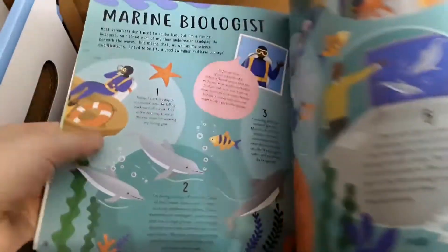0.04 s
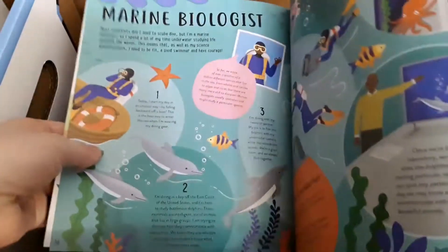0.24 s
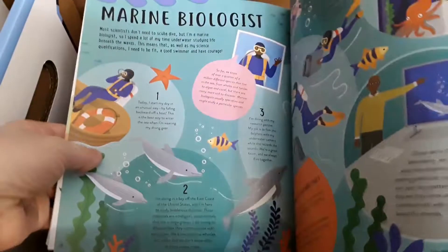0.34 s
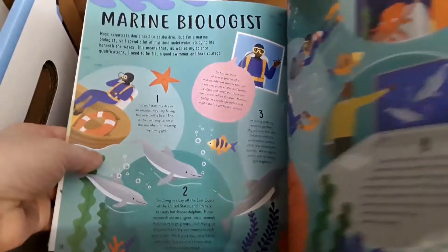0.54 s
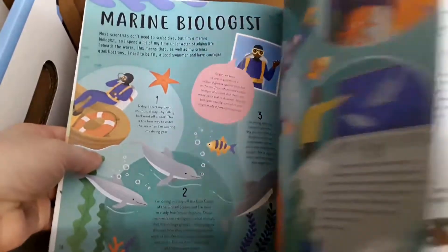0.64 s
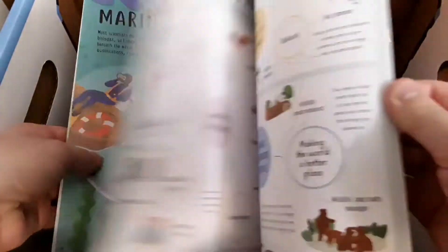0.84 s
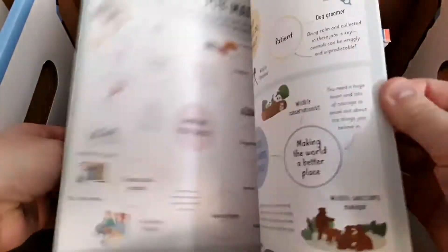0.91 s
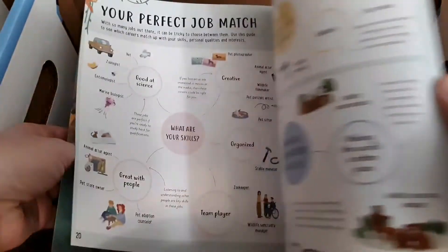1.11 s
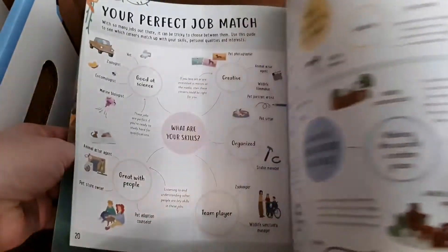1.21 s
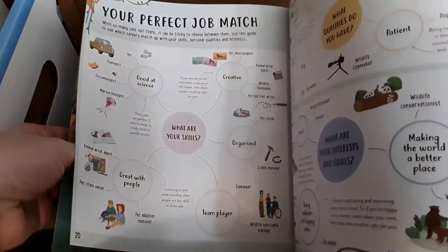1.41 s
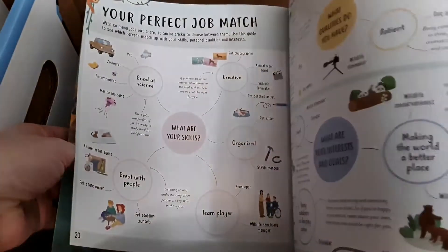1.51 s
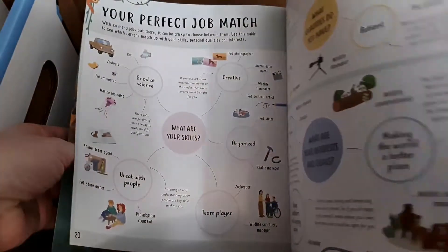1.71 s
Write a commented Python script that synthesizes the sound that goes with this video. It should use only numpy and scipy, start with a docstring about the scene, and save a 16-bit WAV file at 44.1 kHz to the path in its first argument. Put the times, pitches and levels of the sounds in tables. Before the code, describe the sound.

Pages of a book turn close to the microphone in a quiet little room. One sheet rustles, snaps free and lands with a flap; another slides and pops more softly, before a few light fingertip taps.

```python
"""Paper slides and crackles as a picture book's page is turned by hand, close up in a small quiet room. The
sheet snaps free and flaps down, and the book shudders while the page slides over it; a second page buckles with
hollow pops, and fingers tap the book lightly at the end. Friction makes the hiss and ticks of the paper; pops,
slap, shudders and taps are damped modes. The microphone's resonance lifts the high treble."""
import sys
import numpy as np
from scipy import signal
from scipy.fft import rfft, irfft
from scipy.io import wavfile
from scipy.ndimage import uniform_filter1d

SR = 44100
rng = np.random.default_rng(int(sys.argv[2]) if len(sys.argv) > 2 else 0)


def log_audio(samples):
    """Write samples as a 16-bit WAV file to the path given in sys.argv[1]."""
    # one column per channel
    frames = np.atleast_2d(samples).T
    # limit to full scale, then quantise
    limited = np.clip(frames, -1, 1)
    pcm = np.round(limited * 32767).astype(np.int16)
    wavfile.write(sys.argv[1], SR, pcm)


N = 77175
T = np.arange(N) / SR
BIN_HZ = abs(np.fft.fftfreq(2048, 1 / SR))
LANDING_S, SHEET_RISE_S = 0.2103, 0.00081
RUB_RISE_S, RUB_FALL_S = 0.0017, 0.008


def amp(db):
    return 10 ** (np.asarray(db) / 20)


def unit(x):
    return x / np.sqrt(np.mean(x ** 2) + 1e-20)


def curve_at(points, hz):
    """Interpolation on a logarithmic frequency axis."""
    f, value = np.transpose(points)
    return np.interp(np.log(hz + 1), np.log(f + 1), value)


def colour(x, spectrum, tilt_db=0):
    """Spectral shaping, with a tilt per octave above 400 Hz, at rms 1."""
    hz = np.fft.rfftfreq(N, 1 / SR)
    gain_db = curve_at(spectrum, hz) + tilt_db * np.log2(np.maximum(hz, 400))
    return unit(irfft(rfft(x) * amp(gain_db), N))


def minimum_phase(db):
    """The most compact causal impulse response with these gains at BIN_HZ."""
    response = np.fft.ifft(np.exp(np.conj(signal.hilbert(np.log(amp(db)))))).real
    return response[:len(response) // 2]


def gate(start, length, rise, fall):
    """Linear attack, hold, exponential release."""
    t = T - start
    return np.clip(t / rise, 0, 1) * np.exp(-np.maximum(t - length, 0) / fall)


def swells(rows):
    """Gaussian humps of amplitude."""
    return sum(amp(db) * np.exp(-((T - s) / width) ** 2) for s, width, db in rows)


def ring(modes, start, hold, rise, pitch=1, waver=0):
    """Damped modes decay exponentially once the drive ends; waver is the relative rms pitch jitter."""
    out = np.zeros(N)
    for hz, db, t60 in modes:
        speed = 1 + waver * unit(uniform_filter1d(rng.standard_normal(N), size=500)) if waver else 1
        cycles = np.cumsum((T >= start) * speed) * hz * pitch / SR
        out += amp(db) * gate(start, hold, rise, t60 / np.log(1000)) * np.sin(2 * np.pi * cycles)
    return out


def friction(catches_per_s=3000, spread_db=3.5, hiss_share=0.48):
    """Stick-slip friction: paper fibres catch at random over a smooth hiss."""
    catches = (rng.random(N) < catches_per_s / SR) * rng.choice([-1, 1], N)
    strength = amp(spread_db * np.minimum(rng.exponential(1, N), 4))
    hiss = rng.standard_normal(N)
    return np.sqrt(1 - hiss_share) * unit(catches * strength) + np.sqrt(hiss_share) * hiss


def flap():
    """Damped oscillation: the landing sheet swings a few times in one low mode."""
    hz, db, t60 = 274.7, -19.5, 0.022
    return ring([(hz, db, t60)], LANDING_S, hold=0.015, rise=0.0014)


def slap():
    """Impact excitation: the landing sets many modes of the sheet ringing at once."""
    # Each row: frequency in Hz, relative level in dB, T60 in seconds.
    modes = [(325.7, 2.5, 0.12), (424, -12.5, 0.056), (479, -9, .09), (543.7, -4, 0.075), (867, -4, 0.0514),
             (1200, -7, 0.086), (1626, -8.5, .08), (1747, -3.5, 0.022)]
    return amp(-28) * ring(modes, LANDING_S, 0, SHEET_RISE_S)


def pops():
    """Snap-through buckling: the bent sheet jumps to a new shape and rings hollowly."""
    # Each row: start in seconds, level in dB, pitch in Hz.
    buckles = [(.0304, -36, 825), (1.0313, -39, 1010), (1.0357, -27.5, 911), (1.0375, -27, 1074),
               (1.046, -34, 1017), (1.0528, -27.5, 1085), (1.0575, -34.5, 1443), (1.0604, -29, 946),
               (1.065, -38, 1204), (1.071, -34.5, 1055)]
    # Each row: ratio to the pitch, relative level in dB, T60 in seconds.
    modes = [(.38, -5.5, 0.032), (.75, -2, 0.011), (1, 3.5, 0.016), (1.5, -10.5, 0.025)]
    return sum(amp(db) * ring(modes, s, 0, SHEET_RISE_S, hz) for s, db, hz in buckles)


def shudders(book_hz=128.1, book_t60=0.18, flutter_t60=0.13):
    """Driven vibration: the book booms, and the loose sheet flutters at a pitch set by its bend."""
    # Each row: start and length in seconds, boom level in dB, flutter pitch in Hz, flutter level in dB.
    shakes = [(0.04, 0.015, -54.5, 271, -63), (0.148, 0.03, -61, 276, -53.5),
              (.184, 0.016, -50, 285, -41.5), (0.216, 0.046, -31.5, 273, -37),
              (0.273, 0.051, -41.5, 280.3, -42), (.415, 0.016, -55, 330, -81),
              (0.513, 0.034, -44.5, 302, -49), (1.095, 0.016, -53.5, 320, -76)]
    out = np.zeros(N)
    for s, length, boom_db, flutter_hz, flutter_db in shakes:
        modes = [(book_hz, boom_db, book_t60), (flutter_hz, flutter_db, flutter_t60)]
        out += ring(modes, s, length, rise=0.013, waver=0.075)
    return out


def ticks(peak_db=7.5, width_hz=600):
    """Impulse response: a sharp slip of the paper's edge and a scatter of smaller ones ring briefly."""
    # Each row: start in seconds, level in dB, tilt above 4 kHz in dB per octave, resonance in Hz.
    edge_ticks = [(0.1596, -38, -14, 8400), (.2060, -16.5, 1.5, 9430), (0.207, -33, 3, 1800),
                  (0.2111, -26, 10, 8200), (0.217, -26, 7, 8500), (0.2384, -28, -1, 9100),
                  (0.507, -40, -7, 8300), (0.5257, -30, -6, 9600), (0.5454, -25, -6.5, 8920),
                  (0.632, -54.5, -19, 7400), (0.774, -49, -8, 8520), (0.7983, -43.5, -11, 8600),
                  (0.8511, -48, -9, 8500), (1.0241, -34, -3, 3040), (1.69, -49, -13.5, 3110),
                  (1.742, -55, -2, 8900)]
    # Each row: frequency in Hz, gain in dB.
    spectrum = [(200, -6.5), (1500, -11), (4000, -12), (6500, -8.5), (8400, -2), (9800, -1), (12300, -4.5),
                (13500, -13), (16000, -24.5)]
    octaves = np.log2(np.maximum(BIN_HZ, 4000) / 8000)
    out = np.zeros(N)
    for s, db, tilt_db, hz in edge_ticks:
        slips = rng.standard_normal(N) * gate(s, 0, rise=0.00099, fall=0.002)
        slips *= amp(-3) / np.linalg.norm(slips)
        slips[round(s * SR)] += 1  # the main slip, 3 dB above the scatter in energy
        resonance_db = peak_db / (1 + (2 * (BIN_HZ - hz) / width_hz) ** 2)
        response = minimum_phase(curve_at(spectrum, BIN_HZ) + resonance_db + tilt_db * octaves)
        out += amp(db) * signal.oaconvolve(slips, response)[:N]
    return out


def crumples():
    """Stick-slip in the bending sheet gives dull bursts of tiny catches."""
    # Each row: centre and half width in seconds, level in dB.
    bursts = [(.032, 0.0011, -41), (.2098, 0.0023, -29), (.24, 0.0087, -34), (0.517, 0.0049, -57)]
    # Each row: frequency in Hz, relative spectral density in dB.
    spectrum = [(100, -12.5), (400, 10.5), (900, 5.5), (1700, -3.5), (3000, -8.5), (5000, -11.5),
                (9000, -27), (16000, -50)]
    return swells(bursts) * colour(friction(), spectrum)


def slides():
    """Sliding friction of paper on paper: each stroke swells or fades, with its own brightness."""
    # Each row: start and length in seconds, opening level and its change in dB, tilt in dB per octave.
    strokes = [(-.01, 0.045, -64.5, 7.5, 0.5), (0.026, 0.042, -57.5, -13, 0), (0.091, 0.063, -68, 3, 1),
               (0.158, 0.048, -57.5, 8, -0.2), (0.206, 0.055, -48, 0.5, .5),
               (0.27, 0.065, -51.5, -7.5, 1.5), (0.307, 0.05, -66, 10, -5), (0.377, 0.12, -70, -2, 0.5),
               (0.502, 0.031, -63, 12.5, -5.5), (0.552, 0.048, -67.5, 1, -2), (0.614, 0.19, -75.5, 2, -3),
               (0.778, 0.1, -76.5, 0.5, -0.5), (0.857, 0.15, -75.5, 0, -2), (1.0209, 0.014, -60, 8.5, -1.5),
               (1.041, 0.054, -66.5, -4.5, 0.5), (1.077, 0.043, -58.5, 1.5, -1)]
    # Each row: frequency in Hz, relative spectral density in dB.
    spectrum = [(100, -4.5), (300, 12.5), (800, 7.5), (1700, 8), (3000, 0.5), (6000, -6.5), (8500, -2.5),
                (10500, -10.5), (13000, -19), (16000, -23.5)]
    grain, out = friction(), np.zeros(N)
    for s, length, db, change_db, tilt_db in strokes:
        level = amp(db + change_db * np.clip((T - s) / length, 0, 1))
        out += colour(grain, spectrum, tilt_db) * gate(s, length, RUB_RISE_S, RUB_FALL_S) * level
    return out


def scrapes():
    """Friction-driven resonance: each rub excites one band of the sheet, which differs with the grip."""
    # Each row: start and length in seconds, level in dB, resonance and bandwidth in Hz.
    rubs = [(0, 0.081, -61.5, 2090, 825), (0.045, 0.031, -63, 4400, 2720),
            (0.201, 0.12, -65.5, 12500, 4000), (0.552, 0.056, -75.5, 3300, 296),
            (0.786, 0.14, -76, 2700, 710), (0.846, 0.13, -83, 3730, 400), (0.836, 0.13, -91.5, 8360, 300),
            (1.081, 0.041, -62, 2750, 547), (1.061, .05, -76, 5340, 130), (1.054, 0.052, -71, 8350, 500),
            (1.074, 0.037, -74, 12300, 2500)]
    grain, out = friction(), np.zeros(N)
    for s, length, db, hz, width in rubs:
        band = signal.butter(2, [hz - width / 2, hz + width / 2], "band", fs=SR, output="sos")
        out += amp(db) * unit(signal.sosfilt(band, grain)) * gate(s, length, RUB_RISE_S, RUB_FALL_S)
    return out


def taps():
    """Fingertip impacts excite heavily damped modes of the book; a shorter rise sounds harder."""
    # Each row: start in seconds, level in dB, rise in seconds.
    touches = [(0.0306, -46, .0003), (.633, -58, 0.00056), (1.5843, -53.5, 0.0022), (1.601, -57, .003),
               (1.642, -56, 0.00094), (1.691, -50.5, 0.000324), (1.742, -65, 0.0012)]
    # Each row: frequency in Hz, relative level in dB, T60 in seconds.
    modes = [(151, -26, 0.032), (299, 3.5, 0.029), (389, -2.5, 0.03), (741, -6, 0.034),
             (1780, -10.5, 0.011)]
    return sum(amp(db) * ring(modes, s, 0, rise) for s, db, rise in touches)


def puffs():
    """Air displacement: the swinging sheet pushes low wafts at the microphone."""
    # Each row: centre and half width in seconds, level in dB.
    wafts = [(.11, 0.039, -63.5), (.225, 0.019, -60.5), (.32, 0.031, -65.5), (1.03, 0.022, -61.5),
             (1.1, 0.0072, -60)]
    # Each row: frequency in Hz, relative spectral density in dB.
    spectrum = [(20, -37), (45, -6.5), (80, 1), (130, -1), (400, -46), (2000, -68.5)]
    return swells(wafts) * colour(rng.standard_normal(N), spectrum)


def room(x, early_db=-8.5, tail_db=-16.5):
    """Reverberation: sparse reflections from near surfaces, then a faint diffuse tail."""
    # Each row: frequency in Hz, T60 in seconds.
    decay_times = [(100, 0.31), (300, 0.6), (1200, 0.35), (4000, 0.61), (9000, 0.45), (16000, 0.15)]
    hz, t, noise = signal.stft(rng.standard_normal(N), SR, nperseg=256)
    decay = amp(-60 * t / curve_at(decay_times, hz)[:, None])
    tail = signal.istft(noise * decay, SR, nperseg=256)[1][:N] * np.clip(T / 0.03, 0, 1)
    early = rng.standard_normal(N) * (rng.random(N) < 2000 / SR)
    early *= gate(0.0004, 0, rise=0.001, fall=0.01167)
    response = amp(tail_db) * tail / np.linalg.norm(tail) + amp(early_db) * early / np.linalg.norm(early)
    return signal.fftconvolve(x, response)[:N]


def background():
    """The noise floor: still room air and a faint mains hum."""
    # Each row: frequency in Hz, rms level in dB.
    hum_tones = [(61, -78.5), (120, -68.5)]
    # Each row: frequency in Hz, relative spectral density in dB.
    air_spectrum = [(20, -27), (40, -26), (62, -8.5), (90, -8), (125, -7.5), (200, -11), (330, -12.5),
                    (500, -18), (1200, -27.5), (2600, -36.5), (6000, -50), (10000, -52.5), (15500, -48)]
    hum = sum(amp(db) * np.sqrt(2) * np.sin(2 * np.pi * (hz * T + rng.random())) for hz, db in hum_tones)
    return hum + amp(-67.5) * colour(rng.standard_normal(N), air_spectrum)


def scene():
    """Superposition: crisp sounds excite the room; low swings and narrow rubs are heard only directly."""
    crisp = slides() + crumples() + ticks() + pops() + slap() + taps()
    close = flap() + shudders() + scrapes() + puffs()
    return (crisp + room(crisp) + close + background())[None]


def record(dry):
    """Resonance of the microphone's port, a narrow peak on a wide skirt, then a low-pass band limit."""
    port_hz, peak_width_hz, skirt_width_hz, cutoff_hz = 8450, 1050, 3080, 15700
    peak_db = 5 / (1 + (2 * (BIN_HZ - port_hz) / peak_width_hz) ** 4)
    skirt_db = 11 / (1 + (2 * (BIN_HZ - port_hz) / skirt_width_hz) ** 2)
    bright = signal.fftconvolve(dry[0], minimum_phase(peak_db + skirt_db))[:N]
    low_pass = signal.firwin(511, cutoff_hz, window=("kaiser", 9), fs=SR)
    return signal.oaconvolve(bright, low_pass, "same")[None]


dry = scene()
out = record(dry)
log_audio(out)
```